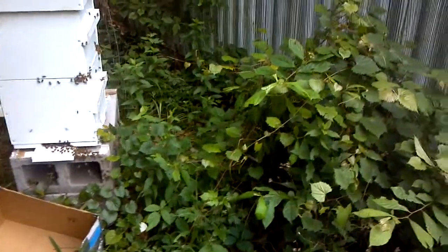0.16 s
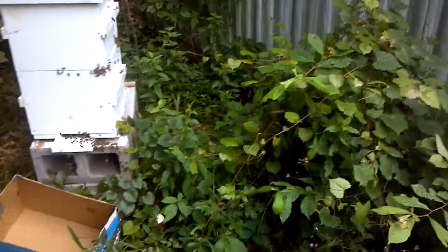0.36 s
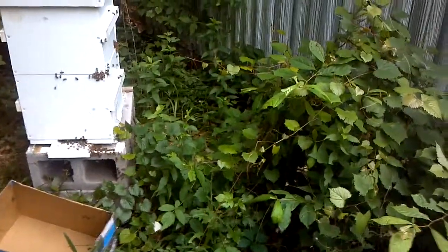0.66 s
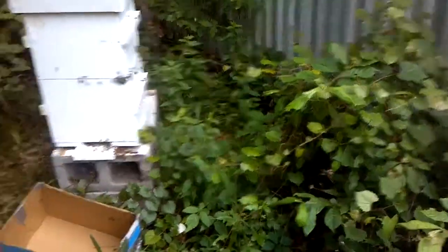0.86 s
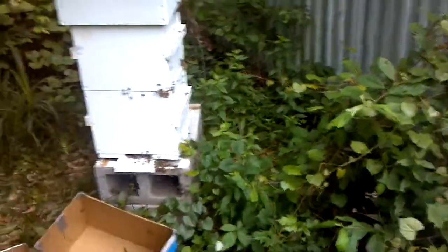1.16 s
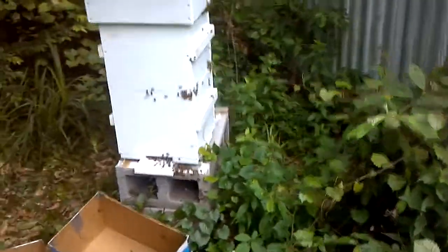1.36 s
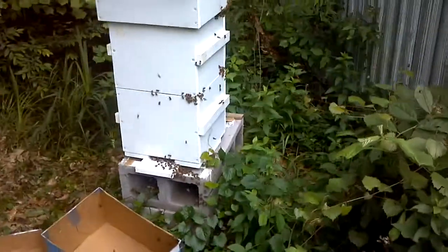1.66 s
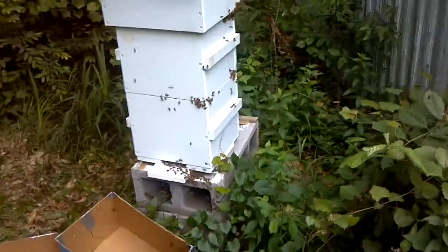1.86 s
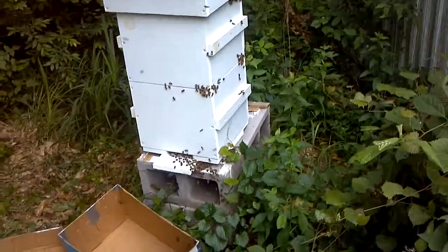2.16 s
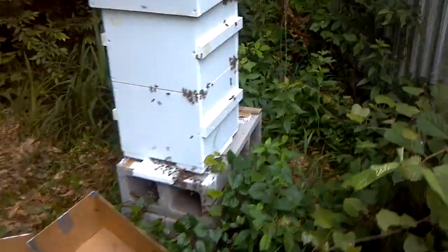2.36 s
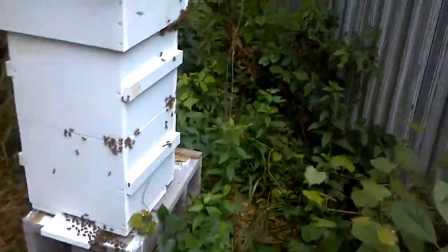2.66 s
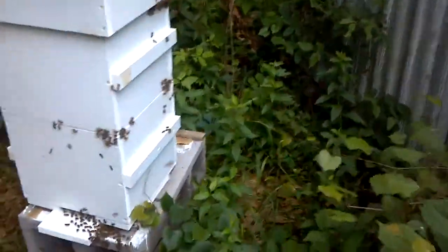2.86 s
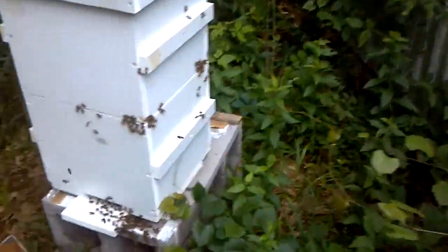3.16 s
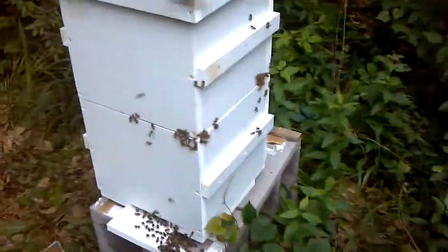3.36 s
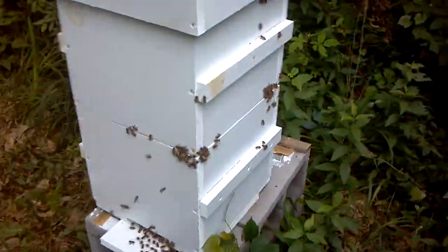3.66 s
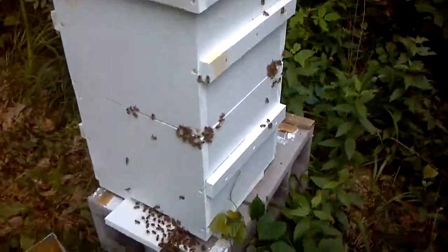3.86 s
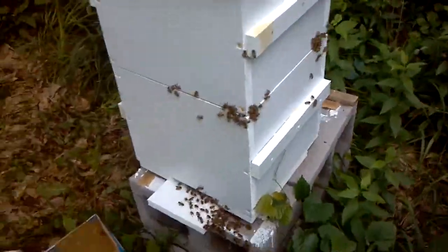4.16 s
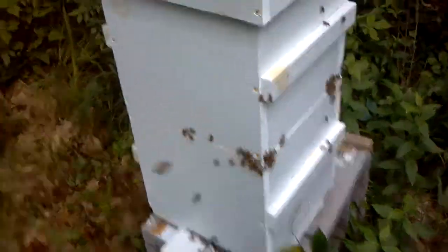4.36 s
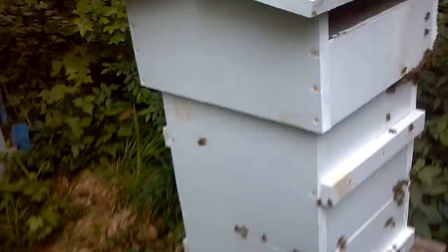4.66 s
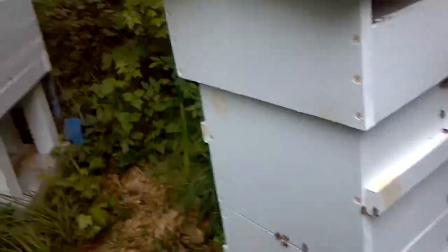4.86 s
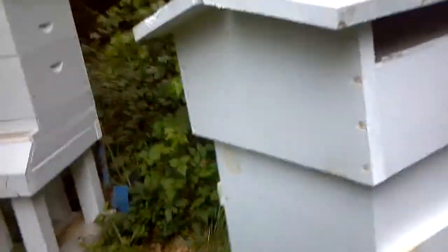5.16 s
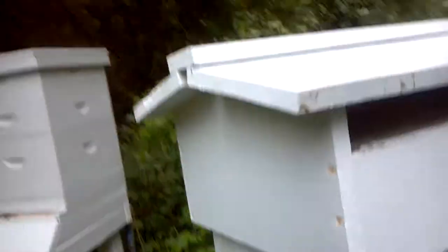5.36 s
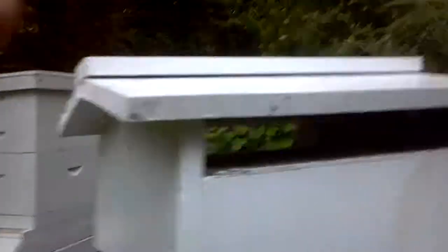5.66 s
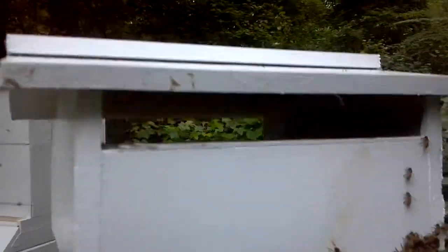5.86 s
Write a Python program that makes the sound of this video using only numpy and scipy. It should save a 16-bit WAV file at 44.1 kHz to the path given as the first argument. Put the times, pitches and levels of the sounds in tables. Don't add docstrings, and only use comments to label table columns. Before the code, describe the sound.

Bees hum softly around an outdoor hive, growing louder as a handheld microphone brushes through leaves, with twig ticks, knocks and a late creak.

```python
import sys
import numpy as np
from scipy import signal
from scipy.fft import rfft, irfft, next_fast_len
from scipy.io import wavfile
from scipy.ndimage import uniform_filter1d, map_coordinates

SR = 44100
rng = np.random.default_rng(int(sys.argv[2]) if len(sys.argv) > 2 else 0)


def dump(signal):
    limited = np.clip(np.atleast_2d(signal).T, -1, 1)
    pcm = np.round(limited * 32767).astype(np.int16)
    wavfile.write(sys.argv[1], SR, pcm)


def how_loud(loudness_db):
    steps = np.asarray(loudness_db, float) / 20
    return 10 ** steps


N = 265651


def in_time(rows):
    s, *columns = np.transpose(rows)
    return [np.interp(np.arange(N) / SR, s, c) for c in columns]


def at_hz(points, hz):
    table_hz, table_db = np.transpose(points)
    return np.interp(np.log(hz + 1), np.log(table_hz), table_db)


def drift(rate_hz, size, count=1):
    knots = rng.standard_normal((count, 400))
    place = np.linspace(1, 1 + rate_hz * N / SR, size)
    return np.array([map_coordinates(k, [place], order=3) for k in knots])


def add(out, start, piece):
    out[:, start:start + piece.shape[1]] += piece[:, :N - start]
    return out


def bandpass(x, low_hz, high_hz):
    return signal.sosfilt(signal.butter(2, [low_hz, high_hz], "band", fs=SR, output="sos"), x)


def highpass(x, cut_hz, order=2):
    return signal.sosfilt(signal.butter(order, cut_hz, "high", fs=SR, output="sos"), x)


def to_ports(total, difference):
    return np.array([total + difference, total - difference])


# f/Hz, level/dB
PORT_DIFFERENCE = [(15, -45), (45, -22), (120, -4.5), (250, -14.5), (500, -9.5), (1000, -6.5), (2000, -0.5),
                   (4000, 2), (8000, 0), (16000, 0.5)]


def diffuse(white, spectrum):
    size = next_fast_len(N)
    hz = np.fft.rfftfreq(size, 1 / SR)
    apart = np.array([np.ones(len(hz)), how_loud(at_hz(PORT_DIFFERENCE, hz))])
    gain = how_loud(at_hz(spectrum, hz)) * apart
    total, difference = irfft(rfft(white, size) * gain, size)[:, :N]
    return to_ports(total, difference) / np.std(total)


AIR_DB = -59
# f/Hz, level/dB per Hz
AIR_SPECTRUM = [(8, -33), (25, 10.5), (60, -12), (100, -24), (160, -1), (350, 0.5), (550, -2.5), (800, -10),
                (2000, -14.5), (3000, -22.5), (16000, -26)]


def outdoor_air():
    return how_loud(AIR_DB) * diffuse(rng.standard_normal((2, N)), AIR_SPECTRUM)


INSECT_HALF_WIDTH_HZ = 200
# t/s, length/s, f/Hz, level/dB
INSECT_TRILLS = [
    (0.0, 0.55, 11500, -68),
    (1.78, .06, 14200, -66),
    (2.81, .08, 14000, -60),
    (3.883, .3, 12000, -63),
    (2.76, .14, 1700, -58),
]


def insects():
    out = np.zeros((2, N))
    for s, length_s, hz, level_db in INSECT_TRILLS:
        size = int(length_s * SR)
        noise = rng.standard_normal((2, size))
        trill = bandpass(noise, hz - INSECT_HALF_WIDTH_HZ, hz + INSECT_HALF_WIDTH_HZ)
        add(out, int(s * SR), trill / np.std(trill) * np.hanning(size) * how_loud(level_db))
    return out


BIRD_S, BIRD_LENGTH_S, BIRD_HZ, BIRD_END_HZ, BIRD_DB = 0.424, 0.089, 13800, 11300, -62


def bird():
    size = int(BIRD_LENGTH_S * SR)
    phase = 2 * np.pi * np.cumsum(np.linspace(BIRD_HZ, BIRD_END_HZ, size)) / SR
    wave = np.sin(phase) * np.hanning(size) * how_loud(BIRD_DB)
    return add(np.zeros((2, N)), int(BIRD_S * SR), to_ports(wave, .6 * wave))


WALK_BRIGHT_DB = -5.5
SWISH_EDGE_DB, SWISH_RISE = 13, 0.36
# t/s, effort level/dB, cloth over leaf/dB
WALK_EFFORT = [(0.0, -64.5, 6.5), (0.23, -56.5, 6), (0.7, -68, 6), (1.24, -65, 6.5), (1.5, -59, 2.5),
               (1.64, -64, 8), (1.86, -62, 6), (2.2, -57.5, 6), (2.42, -61.5, 11), (2.6, -50, 1),
               (2.9, -59, 11), (3.14, -57, 5.5), (3.9, -53, 2.5), (4.36, -50.5, 3), (4.51, -55, 2),
               (5.05, -48, -3), (5.6, -49.5, -1.5), (6.02, -52.5, -1)]
# peak t/s, peak level/dB, length/s, cloth over leaf/dB, brightness/dB
LEAF_SWISHES = [(0.924, -60.5, 0.88, 10, 0), (1.54, -61, 0.062, -1, 2), (1.663, -54.5, .04, -11, -11),
                (1.72, -55.5, 0.088, -11, 4), (1.824, -61, 0.065, -8, 11), (1.424, -59, .1, -5, -1),
                (2.297, -55.5, 1, -1.5, -14), (3.64, -54, 0.51, 2, 1.5), (5.05, -49.5, 0.11, -2, 1),
                (2.43, -49.5, 0.03, -6, 1), (2.48, -44.5, 0.039, 4, -2), (2.51, -54, 0.2, 11.5, -3),
                (2.837, -54.5, 0.12, 6, 1), (3.251, -45, 0.28, 1.5, -2.5), (3.535, -46.5, 0.11, -2, -10.5),
                (3.772, -38, 0.094, 3.5, -6.5), (4.02, -57, .2, -10, -8), (4.43, -47.5, 0.071, -6, -7.5),
                (4.73, -47, .2, -8, -5), (4.837, -41, 0.092, -4, -5), (5.24, -54.5, 0.42, 5.5, 3),
                (5.423, -36.5, 0.1, -3, -10.5), (5.643, -50, 0.027, -13, 1), (5.833, -34, 0.026, -9, -14)]


def effort_and_colour():
    t = np.arange(N) / SR
    walk_db, cloth_db = in_time(WALK_EFFORT)
    leaf = how_loud(2 * walk_db)
    cloth = leaf * how_loud(2 * cloth_db)
    bright = leaf * WALK_BRIGHT_DB
    for s, peak_db, length_s, over_db, bright_db in LEAF_SWISHES:
        away = np.maximum((s - t) / SWISH_RISE, (t - s) / (1 - SWISH_RISE)) / length_s
        power = how_loud(2 * (peak_db - SWISH_EDGE_DB * np.minimum(away, 8)))
        leaf = leaf + power
        cloth = cloth + power * how_loud(2 * over_db)
        bright = bright + power * bright_db
    return 10 * np.log10(leaf), 10 * np.log10(cloth), bright / leaf


GRAIN_DB, FLUTTER_DB = 3.5, 0.5
PATCHY_DB, SLOW_PATCH_DB = 1.2, 1.3
# f/Hz, level/dB per Hz
LEAF_SPECTRUM = [(400, -62), (1500, -34), (2400, -10), (3400, -1.5), (4200, -5), (5200, -1), (6500, 0),
                 (10000, -1.5), (14000, -3), (16500, -5)]
# f/Hz, level/dB per Hz
CLOTH_SPECTRUM = [(60, -67), (250, 8.5), (500, 5), (800, -2), (1300, -2), (2100, 0.5), (3000, -21.5),
                  (5000, -19)]


def brushing():
    leaf_db, cloth_db, bright_db = effort_and_colour()
    effort = np.clip((leaf_db + 64.5) / 15, 0, 1)
    sizes = uniform_filter1d(np.minimum(rng.exponential(1, N), 6), size=12)
    grains = how_loud(GRAIN_DB * effort * 3.06 * (sizes - 1) + FLUTTER_DB * drift(30., N)[0])
    hiss = diffuse(rng.standard_normal((2, N)) * grains, LEAF_SPECTRUM)
    body = diffuse(rng.standard_normal((2, N)) * grains, CLOTH_SPECTRUM)
    edges_hz = np.geomspace(1200, 17000, 9)
    patches = how_loud(PATCHY_DB * drift(25., N, count=8) + SLOW_PATCH_DB * drift(3.08, N, count=8))
    patchy = 0
    for low_hz, high_hz, patch in zip(edges_hz, edges_hz[1:], patches):
        tilt = how_loud((bright_db - 0.5) * np.clip(np.log2(low_hz / 5000) + .5, -.5, 1))
        patchy = bandpass(hiss, low_hz, high_hz) * patch * tilt - patchy
    return how_loud(leaf_db - 2) * patchy + how_loud(cloth_db - 4) * body


# f/Hz, level/dB, t60/s
CASING_MODES = [(458, -13.5, 0.047), (680, -4.5, 0.012), (1018, -11.5, 0.034), (1450, -14.5, 0.008),
                (2176, -19.5, 0.054), (3900, -49, 0.0063)]


def strike(db, hz, crack_db, t60_s, casing_db, crack_hz, crack_s):
    t = np.arange(int(.12 * SR)) / SR
    chance = rng.standard_normal(len(CASING_MODES) + 2)
    wave = np.sin(2 * np.pi * hz * t) * how_loud(-60 * t / max(t60_s, .002))
    for (mode_hz, mode_db, mode_t60_s), c in zip(CASING_MODES, chance):
        decay = how_loud(casing_db + mode_db + 1.7 * c - 60 * t / mode_t60_s)
        wave += decay * np.sin(2 * np.pi * mode_hz * (1 + 0.0565 * c) * t)
    span = signal.butter(1, [0.38 * crack_hz, min(1.68 * crack_hz, 19000)], "band", fs=SR)
    grit = signal.lfilter(*span, rng.standard_normal((2, len(t))))
    crack = grit / np.std(grit) * how_loud(crack_db + 5.5 - 60 * t / crack_s)
    lag = np.gradient(wave) * 2.7 * np.sign(chance[-1] + .5)
    return how_loud(db - 8.5) * (to_ports(wave, lag) + crack)


CONTACT_CUT_HZ, TICK_S = 125., .008
TWIG_T60_S, TWIG_CRACK_HZ = .008, 5200
# t/s, peak level/dB, ring f/Hz, crack level/dB
TWIG_TICKS = [(0.389, -39.5, 1650, -9), (1.447, -45, 869, -1.5), (1.547, -37.5, 910, -0.3),
              (1.587, -39.5, 1550, -8), (1.738, -40, 930, -12), (1.913, -34, 1160, -28),
              (1.931, -40.5, 972, -5.5), (2.537, -26.5, 1600, -8), (2.593, -32.5, 1140, -2),
              (2.629, -33, 905, -11), (2.652, -30.5, 1780, -17), (2.729, -27.5, 1140, -19),
              (3.039, -28.5, 1270, -37), (3.317, -26, 1220, -9.5), (3.355, -31.5, 1080, -20),
              (3.395, -32, 1200, -14), (3.769, -31, 1720, -21), (4.165, -40, 1280, 5),
              (4.439, -41, 1050, 0), (4.689, -34, 1890, -6), (4.823, -29.5, 1350, -4),
              (5.035, -40.5, 1330, 3), (5.099, -33, 990, -2), (5.18, -36, 991, -19), (5.195, -28, 796, -11),
              (5.306, -32.5, 960, -4), (5.345, -31.5, 802, -5), (5.467, -31.5, 1610, -14),
              (5.51, -25.5, 825, -12), (6.009, -29, 990, -17)]


def twigs():
    out = np.zeros((2, N))
    for s, db, hz, crack_db in TWIG_TICKS:
        tick = strike(db + 3.1, hz, crack_db + 2.5, TWIG_T60_S, -14.0, TWIG_CRACK_HZ, TICK_S)
        add(out, int(s * SR), tick)
    return highpass(out, CONTACT_CUT_HZ)


SNAP_T60_S, SNAP_CRACK_DB = 0.01, -5
# t/s, peak level/dB, ring f/Hz
LEAF_SNAPS = [(1.608, -43.5, 6000), (1.659, -35, 3620), (1.714, -36, 6360), (1.727, -56, 12000),
              (1.77, -45, 5860), (1.831, -38, 7140), (2.71, -33, 3640), (3.039, -30.5, 2380),
              (3.527, -32, 3840), (3.53, -29.5, 3640), (3.554, -30.5, 3400), (4.6352, -31.5, 11600),
              (4.8232, -35.5, 3540), (5.0326, -36, 14000), (5.641, -28.5, 3460)]


def leaf_snaps():
    out = np.zeros((2, N))
    for s, db, hz in LEAF_SNAPS:
        add(out, int(s * SR), strike(db, hz, SNAP_CRACK_DB + 2, SNAP_T60_S, -10.0, hz, TICK_S))
    return highpass(out, CONTACT_CUT_HZ)


RING_CYCLES, CASING_DB, CASING_FOLLOWS = 27.3, 0.6, 0.23
# t/s, peak level/dB, ring f/Hz, crack level/dB
CASING_KNOCKS = [(2.4277, -16, 403, -10), (2.4766, -11, 840, -21), (2.481, -11, 422, -17),
                 (2.4814, -14.5, 1040, -24), (2.4892, -32, 390, -24), (2.4959, -15, 320, -17),
                 (2.505, -24, 578, -23), (3.261, -20.5, 344, -35), (3.271, -23, 652, -19),
                 (3.283, -19, 368, -32), (5.091, -24, 636, -17), (5.207, -25, 603, -14.5),
                 (5.235, -29, 660, -11), (5.243, -28.5, 754, -19), (5.253, -27, 610, -25),
                 (5.415, -24.5, 1490, -22), (5.42, -22.5, 774, -2.5), (5.443, -24, 657, -26),
                 (5.798, -11, 1450, -28), (5.838, -14.5, 590, -30), (5.8535, -16.5, 720, -15),
                 (5.874, -28, 442, -26), (5.934, -32, 515, -14), (5.947, -26, 509, -16)]


def knocks():
    out = np.zeros((2, N))
    for s, db, hz, crack_db in CASING_KNOCKS:
        casing_db = CASING_DB + CASING_FOLLOWS * (db + 15.5)
        knock = strike(db, hz, crack_db, RING_CYCLES / hz, casing_db, crack_hz=2600, crack_s=0.034)
        add(out, int(s * SR), knock)
    return highpass(out, CONTACT_CUT_HZ)


WING_GAP_S, FIRST_HIT_DB, FIRST_HIT_PITCH = .0042, -4.5, 0.66
HIT_CYCLES, HIT_CRACK_DB, HIT_CASING_DB = 21, -16.5, 1
WING_HIT_CUT_HZ = 360
# t/s, peak level/dB, ring f/Hz, fade per hit/dB, pitch kept per hit/0-1
WING_BURSTS = [
    (5.795, -12.5, 1450, 5, 0.8),
    (5.8214, -9, 1320, 4.5, 1),
    (5.8466, -18.5, 1260, 1.5, 0.81),
]


def wing_bursts():
    out = np.zeros((2, N))
    for s, db, hz, fade_db, kept in WING_BURSTS:
        for k in range(5):
            if k == 0:
                hit_db, hit_hz = db + FIRST_HIT_DB, hz * FIRST_HIT_PITCH
            else:
                hit_db, hit_hz = db - fade_db * (k - 1), hz * kept ** (k - 1)
            hit = strike(hit_db, hit_hz, HIT_CRACK_DB, HIT_CYCLES / hit_hz, HIT_CASING_DB,
                          crack_hz=2940, crack_s=0.03)
            add(out, int((s + k * WING_GAP_S) * SR), hit)
    return highpass(out, WING_HIT_CUT_HZ)


COLONY_HZ, COLONY_HALF_WIDTH_HZ, COLONY_DB = 122.3, 18.4, -66.5


def colony():
    noise = rng.standard_normal((2, N))
    total, difference = bandpass(noise, COLONY_HZ - COLONY_HALF_WIDTH_HZ, COLONY_HZ + COLONY_HALF_WIDTH_HZ)
    pair = to_ports(total, how_loud(at_hz(PORT_DIFFERENCE, COLONY_HZ)) * difference)
    return how_loud(COLONY_DB + 0.45 * (in_time(SWARM_NEARNESS)[0] + 54.5)) * pair / np.std(total)


# multiple, level/dB
NEAR_WING_OVERTONES = [(1, 3.5), (2, -5), (3, -17), (4, -15)]
# t/s, length/s, wingbeat f in/Hz, wingbeat f out/Hz, level/dB
BEE_PASSES = [
    (0.722, 0.36, 255, 245.5, -62),
    (2.103, 0.15, 257, 250, -60.5),
    (2.801, 0.19, 201, 200, -58),
    (3.277, 0.18, 226.4, 220.4, -49.5),
    (3.499, 0.39, 250, 237, -50),
    (4.397, 0.25, 241, 228, -73),
    (5.105, 0.21, 245, 235.6, -49),
    (5.437, 0.27, 252.3, 251, -46.5),
]


def passes():
    out = np.zeros((2, N))
    for s, length_s, in_hz, out_hz, level_db in BEE_PASSES:
        size = int(length_s * SR)
        waver = 1 + 0.013 * drift(1.95, size)[0]
        phase = 2 * np.pi * np.cumsum(np.linspace(in_hz, out_hz, size) * waver) / SR
        wave = sum(how_loud(wing_db) * np.sin(multiple * phase) for multiple, wing_db in NEAR_WING_OVERTONES)
        wave = wave * np.hanning(size) * how_loud(level_db + 2. * drift(1.84, size)[0])
        add(out, int(s * SR), to_ports(wave, 6.4 * np.gradient(wave)))
    return out


# t/s, wing hum level/dB
SWARM_NEARNESS = [(0.0, -52.5), (0.15, -52), (0.64, -54), (0.92, -56), (1.21, -52.5), (2.23, -57.5),
                  (2.58, -53), (2.83, -50), (2.97, -51), (5.13, -41.5), (5.37, -42.5), (5.63, -43.5),
                  (6.02, -44.5)]
# wingbeat f/Hz, spread/share, level/dB
FLYER_KINDS = [(250, .045, -2.5), (228, .05, -4.5), (200, .05, -5.5)]
# multiple, level/dB
WING_OVERTONES = [(1, -1.5), (2, 0), (3, -10), (4, -14.5), (5, -12.5), (6, -16.5), (7, -23)]


def swarm(count=10):
    slower = 8
    size, total, difference = N // slower + 1, 0, 0
    for hz, spread, level_db in FLYER_KINDS:
        own = rng.standard_normal((count, 1))
        wander = .7 * own + .8 * drift(4., size, count=count) + .3 * drift(30., size, count=count)
        beat_hz = hz * (1 + spread * wander)
        phase = 2 * np.pi * slower * np.cumsum(beat_hz, axis=1) / SR
        near = how_loud(level_db + 3.35 * drift(4.4, size, count=count) + 3.6 * drift(18., size, count=count))
        bearing = drift(1.47, size, count=count)
        for multiple, wing_db in WING_OVERTONES:
            turn = multiple * phase + rng.uniform(0, 2 * np.pi, (count, 1))
            total = total + how_loud(wing_db) * np.sum(near * np.sin(turn), axis=0)
            lag = how_loud(wing_db + at_hz(PORT_DIFFERENCE, multiple * hz)) * bearing
            difference = difference + np.sum(near * lag * np.cos(turn), axis=0)
    pair = signal.resample_poly(to_ports(total, difference), slower, 1, axis=1)[:, :N]
    return how_loud(in_time(SWARM_NEARNESS)[0] - 2.0) * pair / np.std(total)


def scene():
    background = outdoor_air() + insects() + bird()
    handling = brushing() + twigs() + leaf_snaps() + knocks() + wing_bursts()
    bees = colony() + passes() + swarm()
    return background + handling + bees


# f/Hz, level/dB
MIC_COLOUR = [(12, -29), (45, -1.75), (3700, -0.24), (4150, -0.5), (5200, -1), (6000, 1.5), (6800, 0),
              (10200, 2.1), (10900, -0.5), (14800, 1.5), (16000, -9)]


def microphone(dry):
    size = next_fast_len(N + SR // 2)
    gain = how_loud(at_hz(MIC_COLOUR, np.fft.rfftfreq(size, 1 / SR)))
    return irfft(rfft(dry, size) * gain, size)[:, :N]


def roll_off(x):
    return signal.sosfilt(signal.butter(12, 16460, fs=SR, output="sos"), x)


CROSS_LAG_SAMPLES, CUTOFF_HZ, RUMBLE_CUT_HZ = 17, 15730, 38


def record(dry):
    ports = microphone(dry)
    late = np.pad(ports, ((0, 0), (CROSS_LAG_SAMPLES, 0)))[::-1, :N]
    top_cut = signal.ellip(12, .5, 42, CUTOFF_HZ, fs=SR, output="sos")
    mix = signal.sosfilt(top_cut, ports - late)
    mix = highpass(mix, RUMBLE_CUT_HZ, order=3)
    return roll_off(mix)


dry = scene()
out = record(dry)
dump(out)
```